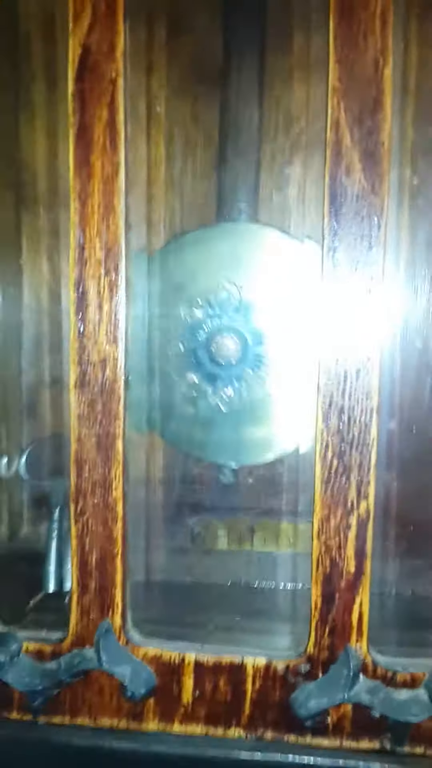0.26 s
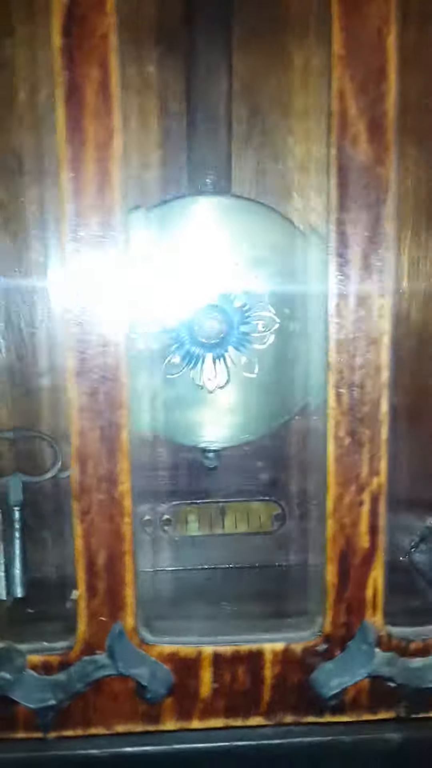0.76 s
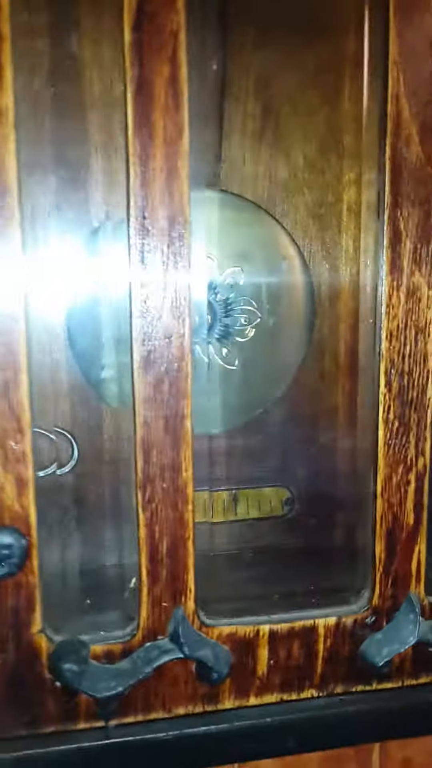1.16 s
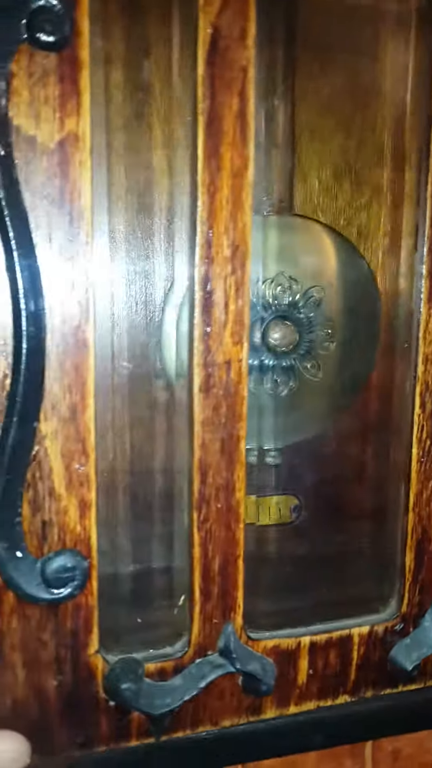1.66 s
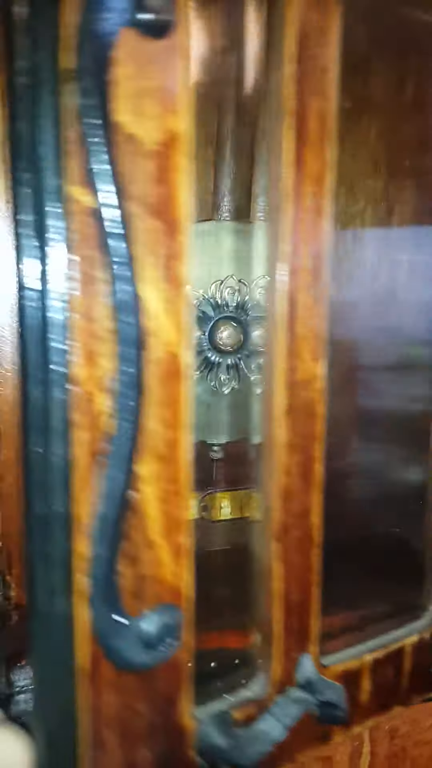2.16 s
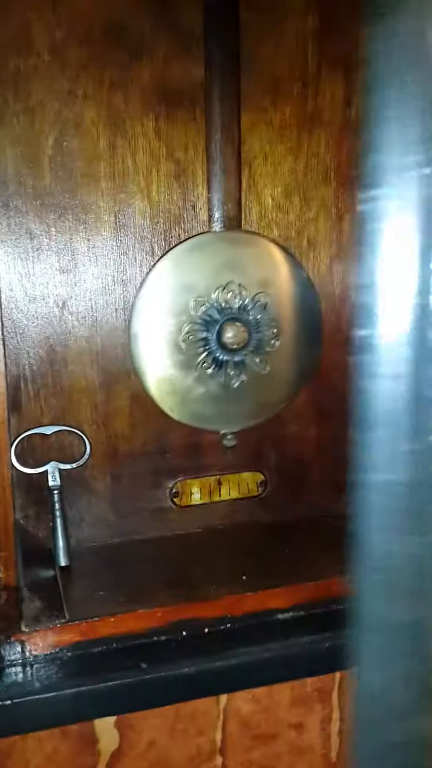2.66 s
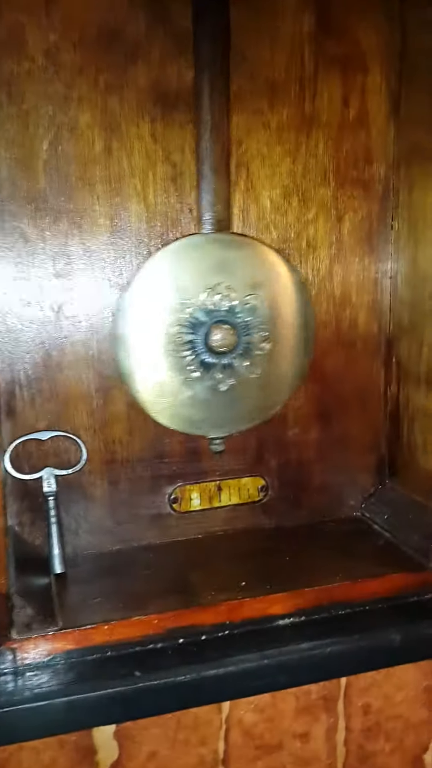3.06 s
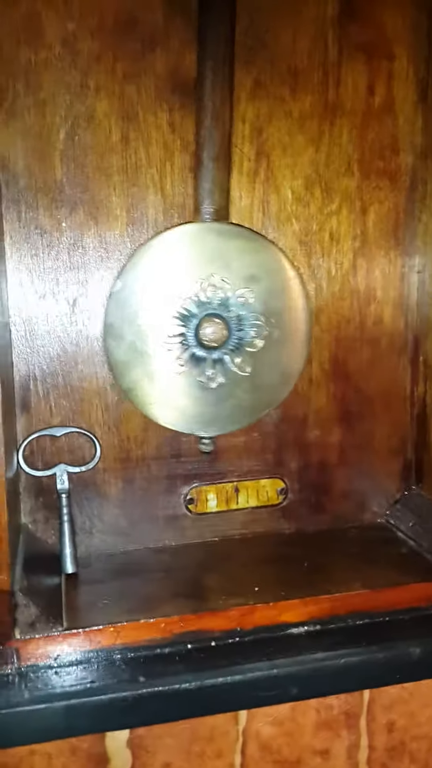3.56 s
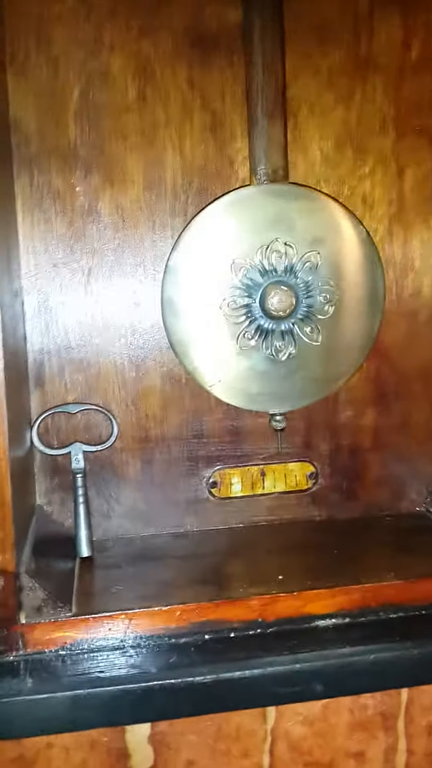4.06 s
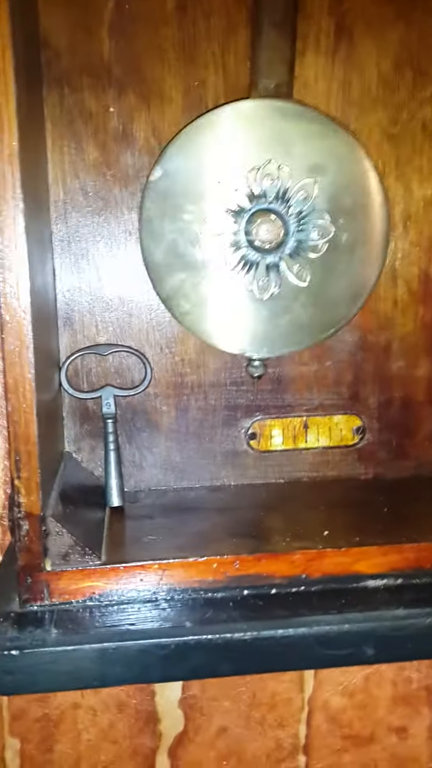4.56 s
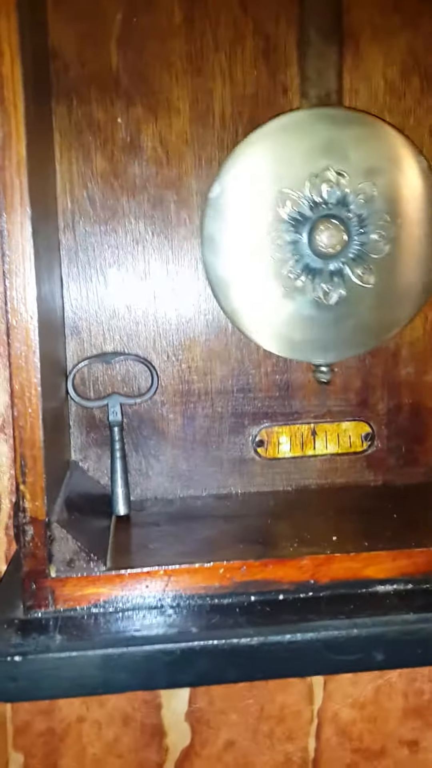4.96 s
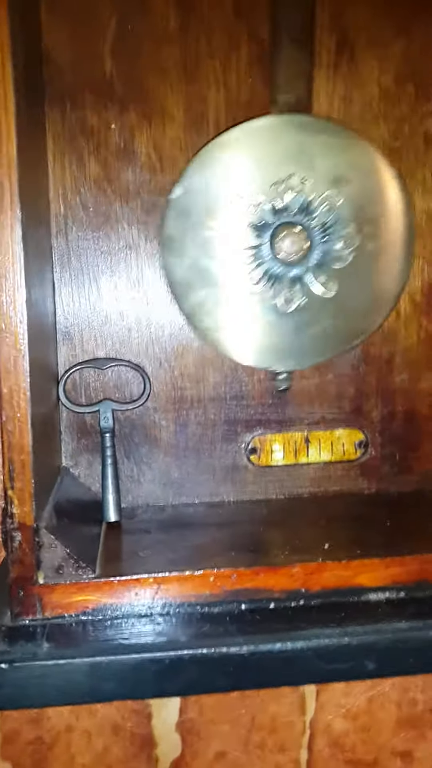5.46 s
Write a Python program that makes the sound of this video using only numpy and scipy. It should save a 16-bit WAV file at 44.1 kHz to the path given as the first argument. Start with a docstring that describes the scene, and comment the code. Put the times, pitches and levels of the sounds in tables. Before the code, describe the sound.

Metallic snaps and a wooden knock free a glazed clock door, then clear, slightly off-beat ticking continues over faint hum.

```python
"""First a dying metallic wash, then two sharp snaps of a door catch, over still air and a low motor hum; then
a wall clock ticks, slightly out of beat. A hand works the catch, and the glazed door comes free with a wooden
knock and swings open, so the ticking sounds brighter. Each tick is noise plus fading tones of wheel, plates and
case; the catch is shaped noise, the knocks are wood tones and noise. Beats and knocks keep the coiled gong
ringing faintly."""
import sys
import numpy as np
from scipy import signal
from scipy.fft import rfft, irfft, next_fast_len
from scipy.io import wavfile
from scipy.ndimage import uniform_filter1d, map_coordinates

SR = 44100
rng = np.random.default_rng(int(sys.argv[2]) if len(sys.argv) > 2 else 0)


def persist_wave(psi):
    """Save psi, clipped to +-1, as 16-bit WAV."""
    counts = np.round(np.clip(psi, -1, 1) * 32767).astype(np.int16)
    wavfile.write(sys.argv[1], SR, np.atleast_2d(counts).T)


N = 252468
NOW = np.arange(N) / SR  # time through the whole scene, s
T = np.arange(SR * 3 // 4) / SR  # time within one short sound, s

# All levels inside a colour or a set of tones are relative; each sound is scaled as a whole later.
# still air: pitch_hz, level_db_per_hz
AIR_COLOUR = [(20, -15), (35, -19), (60, -18.5), (110, -12.5), (200, -12.5), (280, -18.5), (545, -22),
              (1100, -26), (1650, -27.5), (2050, -23), (4250, -29), (5900, -23), (7500, -30.5),
              (16000, -32)]
# motors in the house: pitch_hz, level_db
MOTOR_HUM = [(48.6, -79), (52.6, -79), (97.6, -68.5), (129.5, -77.5), (147, -70.5), (245, -84.5),
             (342, -83)]
# left-right balance of the background: pitch_hz, left_minus_right_db
AIR_BALANCE = [(60, 4), (200, 1), (700, 1), (1290, -5.5), (2400, -1), (4400, -0.5), (8100, 1),
               (15000, -0.5)]
# left-right balance of the clock and its door: pitch_hz, left_minus_right_db
CLOCK_BALANCE = [(60, -29), (110, 4.5), (200, 1), (400, 2), (1300, -2), (2400, -1), (4400, -0.5),
                 (8100, 5.5), (15000, 5.5)]
# how alike left and right are: pitch_hz, likeness (1 is the same)
LIKENESS = [(60, 0.67), (150, 0.97), (300, 0.68), (640, 0.52), (1400, -0.23), (3100, 0.16), (7000, -0.065),
            (15000, 0.017)]
# how long the room rings, as time to fall 60 dB: pitch_hz, t60_s
ROOM_DECAY = [(150, 0.63), (600, 0.53), (2000, 0.4), (6000, 0.35), (14000, 0.13)]

# the hand slides on the case, the door rubs on its hinges: start_s, length_s, level_db
RUBS = [(0, .07, -61), (0.553, 0.16, -60), (0.834, .05, -64.5), (0.988, .28, -61), (1.29, 0.18, -52.5),
        (1.59, 1.2, -65), (1.9, 0.076, -61.5)]
# sound of the rubbing: pitch_hz, level_db_per_hz
RUB_COLOUR = [(100, 4), (250, 10), (600, 2), (1200, 0), (2200, 0.5), (3500, -3), (6000, 3), (9000, -7.5),
              (16000, -12)]
RUB_ATTACK_S, RUB_RELEASE_S = 0.01, 0.077

# how freely the clock's sound comes out: time_s, clearness (0 to 1)
CLEARNESS = [(0, 0.52), (1.32, 0.43), (1.6, 0.65), (2.2, 0.7), (2.7, 1)]
# what is let through at clearness 0: pitch_hz, level_db
MUFFLING = [(600, 3.5), (2000, 0.5), (3200, -16), (6400, -3.5), (11000, -36)]
# the door bumps in its frame: start_s, level_db, pitch_hz, contact (hard or soft)
KNOCKS = [(0.147, -56, 300, "hard"), (1.052, -50, 573, "soft"), (1.3176, -29, 234, "hard"),
          (1.356, -36.5, 330, "hard"), (1.425, -40, 170, "soft"), (1.597, -53, 215, "soft"),
          (1.992, -48, 504, "soft"), (2.101, -59.5, 202, "soft"), (2.485, -48.5, 260, "soft"),
          (2.509, -45.5, 267, "soft")]
# tones of the wooden case and door: pitch_hz, level_db, t60_s
WOOD_TONES = [(92, -15, .2), (128, -11, .2), (146, -1, .26), (174, 0, .24), (203, 2, .38), (276, -9, .22),
              (322, -1, .28), (383, -8, .34), (415, -14, .25), (440, -14, .25), (472, -12, .28),
              (499, -10, .33), (534, -11, .3), (570, -13, .22), (600, -9, .24), (648, -11, .22),
              (727, -15, .25), (827, -10, .25), (862, -13, .22)]
# wood tones too crowded to tell apart: pitch_hz, level_db_per_hz
THUD_COLOUR = [(50, -37), (110, 12), (200, -10.5), (270, 10), (600, -8), (1000, -6.5), (2500, -4),
               (8000, -41)]
# how far a blow reaches to each side of its pitch, and its rise time
HARD_REACH_OCTAVES, HARD_BLOW_RISE_S = 1.7, 0.0013
SOFT_REACH_OCTAVES, SOFT_BLOW_RISE_S = 0.37, 0.0011

# catch and hinges snap and scrape: start_s, level_db, hardness (0 to 1), t60_s, brightness_db_per_octave
SNAPS = [(0.0, -45, 0.65, 0.32, -2.5), (0.083, -34, 0.7, 0.36, 1), (0.138, -33, 0, 0.26, -1),
         (0.618, -42.5, 0.34, 0.23, -1.1), (0.671, -47.5, 0.2, 0.25, 1.3), (1.2746, -45, 0.54, .6, -1.5),
         (1.3167, -43, 0.84, .45, 3), (1.355, -35.5, 0.44, 0.3, -3.5), (2.508, -54.5, 0.5, 0.28, -0.5),
         (2.665, -52.5, 0.05, 0.19, 0.5), (4.167, -57.5, 0.34, 0.088, -4)]
# metal of the catch: pitch_hz, level_db_per_hz
METAL_COLOUR = [(180, -13), (300, -28), (405, -11), (624, -12.5), (1150, -13.5), (1780, -2.5), (2520, -3.5),
                (6850, 4.5), (8220, -7), (14000, -13), (15200, -23), (16000, -37)]
SOFT_RISE_S, HARD_RISE_S = .005, .0005
SOFT_CRACK_DB, HARD_CRACK_DB, CRACK_T60_S = -6, 14, .0035

# a faint tone at 1179 Hz, then the high overtones of the coiled gong: pitch_hz, level_db
RINGING_TONES = [(1179, -87), (2745, -88), (3090, -89.5), (5394, -94), (5690, -99), (5739, -83.5),
                 (5787, -80.5), (6132, -87.5), (6180, -103)]
GONG_DECAY_S, GONG_WAVER_DB = 0.99, 2.5  # time for the shaking to fall to about a third; random waver
JOLT_DB = 35  # a knock's shake over its level
# a low note, and how its level changes at clearness 0
NOTE_HZ, NOTE_DB, NOTE_MUFFLED_DB, NOTE_SWELL_DB = 193.7, -71, -9, 3

# a tooth lands on a pallet, tick and tock in turn: start_s, level_db, plates_db
BEATS = [(0.498, -45, 0.5), (1.094, -45.5, -5), (1.654, -42, -7), (2.242, -44, -2), (2.798, -39.5, -5),
         (3.389, -43.5, -1), (3.943, -41.5, 1), (4.537, -41.5, 0), (5.090, -41.5, 1.5), (5.687, -41, -4)]
# case under the movement: pitch_hz, tick_db, tock_db, t60_s
BOARD_TONES = [(311, -18.5, -15.5, 0.43), (538.6, -4, -8.5, 0.31), (594, -8, -8, 0.32),
               (622, -30, -12, 0.29), (757, -34, -9.5, 0.14), (812, -16, -8, 0.13), (940, -7.5, -9, 0.083),
               (983, -1, -12, 0.12), (1064, -28, -43.5, 1), (1500, -20.5, -20, 0.54), (1756, -20.5, -30, 1)]
# brass plates and anchor: pitch_hz, tick_db, tock_db, t60_s
PLATE_TONES = [(1960, -12.5, -22, 0.16), (1985, -7, -4, 0.21), (2050, -6, -26, 0.23),
               (2150, -5.5, -8.5, 0.31), (2177, 2, -4, 0.096), (2340, -52, -13, .16), (2561, 5, -2, 0.1),
               (2590, 5.5, 7, 0.06), (2820, -9, -59, 0.037), (2860, -20, -8, 0.2)]
# escape wheel: pitch_hz, tick_db, tock_db, t60_s
WHEEL_TONES = [(4920, -12, -13, .11), (5040, -12, -13, .1), (5330, -13, -10, .09), (5830, -18, -14, .13),
               (6115, -17, -11, .13), (6255, -16, -13, .13), (6390, -14, -13, .13), (6505, -10, -8, .14),
               (6590, -14, -10, .1), (7127, -15, -20, .12)]
# crowded short tones of the movement: pitch_hz, level_db_per_hz
CLACK_COLOUR = [(200, -13), (500, -4), (1250, -6.5), (2250, 1.5), (3500, -9), (5000, -2.5), (6500, 3.5),
                (8400, -21), (11000, -10), (13000, -14.5), (16000, -26)]
# first contact of steel on brass: pitch_hz, level_db_per_hz
SNAP_COLOUR = [(2000, -5), (6000, -1), (8400, -6), (11500, 2.5), (16000, -9.5)]
# tooth sliding on a pallet: pitch_hz, level_db_per_hz
SLIDE_COLOUR = [(120, -61), (300, -7), (550, -7.5), (1100, 2.5), (1750, 6), (2300, 3), (3600, -10),
                (5800, -3), (8500, -13.5), (16000, -18)]
# what each pallet shakes, over the level of the beat
TICK_CASE_DB, TICK_WHEEL_DB, TICK_RUB_DB = -4.5, 2.2, -13
TOCK_CASE_DB, TOCK_WHEEL_DB, TOCK_RUB_DB = -2.2, 5, -20

TOP_HZ = 15700  # nothing is heard above this


def amp(db):
    """Turn decibels into a plain multiplier."""
    return 10 ** (np.asarray(db) / 20)


def unit(x):
    """Scale to an rms (average strength) of 1."""
    return x / np.sqrt(np.mean(x ** 2) + 1e-20)


def along(points, hz):
    """Read a value between (pitch, value) points, on a log pitch axis."""
    f, v = np.transpose(points)
    return np.interp(np.log(hz + 1), np.log(f + 1), v)


def fade(t60, rise):
    """Loudness of a blow: a quick rise, then a steady dying away."""
    return np.exp(-np.log(1000) * T / t60) * (1 - np.exp(-T / rise))


def filtered(x, gain):
    """Multiply each pitch in x by its own gain."""
    n = x.shape[-1]
    m = next_fast_len(n + SR // 4)  # spare room, so the end does not wrap round to the start
    return irfft(rfft(x, m) * gain(np.fft.rfftfreq(m, 1 / SR)), m)[..., :n]


def spread(hz):
    """Angle between middle and side: bass is more alike at both ears than treble."""
    return np.arccos(np.clip(along(LIKENESS, hz), -1, 1)) / 2


def noise(colour, size=len(T)):
    """Stereo noise of rms 1 with the given balance of pitches."""
    def gain(hz):
        return amp(along(colour, hz)) * np.array([np.cos(spread(hz)), np.sin(spread(hz))])
    mid, side = filtered(rng.standard_normal((2, size)), gain)
    return unit(np.array([mid + side, mid - side]))


def uneven(depth_db, smooth_samples):
    """A random roughness of loudness, for gritty sounds."""
    return amp(depth_db * unit(uniform_filter1d(rng.standard_normal(len(T)), size=smooth_samples)))


def wobble(rate):
    """A smooth random curve through this many random points a second."""
    return map_coordinates(rng.standard_normal(256), [NOW * rate], mode="mirror")


def ring(tones, rise, blur_hz):
    """Struck tones die away, a little different each time; reflections blur each pitch."""
    out = np.zeros((2, len(T)))
    for k, (hz, db, t60) in enumerate(tones):
        lag = spread(hz) * rng.choice([-1, 1]) * np.array([[1], [-1]])
        drift = np.cumsum(rng.standard_normal(len(T))) * np.sqrt(2 * np.pi * blur_hz / SR)
        drift = uniform_filter1d(drift, size=160)
        tone = np.sin(2 * np.pi * hz * T + lag + drift)
        out += (-1) ** k * amp(db + rng.normal()) * fade(t60, rise) * tone
    return out


def add(track, s, sound):
    """Mix a sound into a track at time s."""
    start = max(round(s * SR), 0)
    part = track[:, start:start + sound.shape[1]]
    part += sound[:, :part.shape[1]]


def in_case(x, echo_db, count=6):
    """The near walls of the case return a few quick echoes, which strengthen some pitches and weaken others."""
    out = x.copy()
    for delay, sign in zip(rng.uniform(.001, .008, count), rng.choice([-1, 1], count)):
        add(out, delay, sign * amp(echo_db) * x)
    return out / np.sqrt(1 + count * amp(echo_db) ** 2)


def in_room(x, wet_db):
    """The room answers with a wash of echoes, whose pitches die away at their own speeds."""
    hz, t, bands = signal.stft(noise([(100, 0), (10000, 0)]), SR, nperseg=256)
    decay = np.exp(-np.log(1000) * t / along(ROOM_DECAY, hz)[:, None])
    tail = signal.istft(bands * decay, SR, nperseg=256)[1][:, :len(T)]
    tail = tail * (1 - np.exp(-T / 0.00074))
    tail = tail / np.linalg.norm(tail[0])
    # the left channel alone feeds both sides of the room
    return x + amp(wet_db) * signal.fftconvolve(x[:1], tail, axes=1)[:, :len(T)]


def clearness():
    """How freely the clock's sound comes out, from 0 to 1."""
    return np.clip(np.interp(NOW, *np.transpose(CLEARNESS)), 0, 1)


def panned(x, balance):
    """Each pitch is heard at unlike levels left and right."""
    return filtered(x, lambda hz: amp(along(balance, hz) * np.array([[.5], [-.5]])))


def background():
    """Still air is soft noise; the motor hum is low tones that waver in level and phase."""
    hum = 0
    for hz, db in MOTOR_HUM:
        hum = hum + amp(db + 2.2 * wobble(5)) * np.sin(2 * np.pi * hz * NOW + .7 * wobble(7))
    return hum + amp(-66.0) * noise(AIR_COLOUR, size=N)


def low_note():
    """A low 194 Hz note that swells unevenly, louder as the door opens."""
    level_db = NOTE_DB + NOTE_MUFFLED_DB * (1 - clearness()) + NOTE_SWELL_DB * wobble(8.9)
    return amp(level_db) * np.sin(2 * np.pi * NOTE_HZ * NOW + .8 * wobble(9))


def rubbing():
    """Sliding surfaces make noise: each rub sets in, holds and dies away, a little unevenly."""
    power = np.zeros(N)
    for s, length, db in RUBS:
        attack = np.clip((NOW - s) / RUB_ATTACK_S, 0, 1)
        release = np.exp(-np.maximum(NOW - s - length, 0) / RUB_RELEASE_S)
        power += (amp(db) * attack * release) ** 2
    return np.sqrt(power) * amp(2.0 * wobble(34.88)) * noise(RUB_COLOUR, size=N)


def door():
    """Each bump excites the wood around its own pitch; a hard one reaches more widely."""
    out = np.zeros((2, N))
    for s, db, blow_hz, contact in KNOCKS:
        hard = contact == "hard"
        octaves = HARD_REACH_OCTAVES if hard else SOFT_REACH_OCTAVES
        rise = HARD_BLOW_RISE_S if hard else SOFT_BLOW_RISE_S

        def reach_db(hz):
            return -10 * np.log10(1 + (np.log2((hz + 1) / blow_hz) / octaves) ** 4)

        struck = [(hz, level + reach_db(hz), t60) for hz, level, t60 in WOOD_TONES]
        tones = ring(struck, rise=rise, blur_hz=1.0)
        thud = noise(THUD_COLOUR) * fade(t60=.22, rise=rise)
        thud = filtered(thud, lambda hz: amp(reach_db(hz)))
        add(out, s, amp(db - 1.0) * (tones + thud))
    return out


def catch():
    """A crack, then a gritty wash of metal and glass; harder contact starts faster and cracks more."""
    out = np.zeros((2, N))
    for s, db, hardness, t60, bright_db in SNAPS:
        rise = SOFT_RISE_S * (HARD_RISE_S / SOFT_RISE_S) ** hardness
        crack_db = SOFT_CRACK_DB + (HARD_CRACK_DB - SOFT_CRACK_DB) * hardness
        colour = [(hz, level + bright_db * np.log2(hz)) for hz, level in METAL_COLOUR]
        wash = uneven(0.52, smooth_samples=110) * fade(t60, rise)
        crack = amp(crack_db) * fade(CRACK_T60_S, rise=.0001)
        add(out, s, amp(db) * noise(colour) * (wash + crack))
    return out


def gong():
    """Beats and knocks keep the gong's high overtones ringing, with a faint tone at 1179 Hz."""
    def shake(s):
        return (NOW > s) * np.exp(-np.abs(NOW - s) / GONG_DECAY_S)

    from_beats = sum(shake(s) for s, *_ in BEATS)
    from_knocks = np.sqrt(sum((amp(db + JOLT_DB) * shake(s)) ** 2 for s, db, *_ in KNOCKS))
    tones = np.zeros((2, N))
    for hz, db in RINGING_TONES:
        lag = spread(hz) * np.array([[1], [-1]])
        tone = np.sin(2 * np.pi * hz * NOW + .6 * wobble(26) + lag)
        tones += amp(db + GONG_WAVER_DB * wobble(5.01)) * tone
    # overtones too crowded to tell apart: pitch_hz, level_db_per_hz
    crowded = [(4000, -24), (5300, -40), (5800, -32), (6400, 0), (7600, -10), (10000, -65)]
    shimmer = amp(-88.5) * noise(crowded, size=N)
    return (from_beats + from_knocks) * (tones + shimmer)


def slide(peak_s, width_s):
    """A tooth rubs grittily along the pallet face, swelling and fading; the case colours the sound."""
    grit = unit(uneven(2.5, smooth_samples=180))
    swell = 1 / np.cosh((T - peak_s) / width_s) ** 2
    return in_case(noise(SLIDE_COLOUR) * grit, echo_db=-4.5) * swell


def escapement():
    """Each tooth drops on a pallet and rings wheel, plates and case; low clearness muffles the treble."""
    out = np.zeros((2, N))
    for k, (s, db, plates_db) in enumerate(BEATS):
        tock = k % 2 == 1
        case_db = TOCK_CASE_DB if tock else TICK_CASE_DB
        wheel_db = TOCK_WHEEL_DB if tock else TICK_WHEEL_DB

        def struck(table):
            return [(hz, tock_db if tock else tick_db, t60) for hz, tick_db, tock_db, t60 in table]

        plates = amp(plates_db) * ring(struck(PLATE_TONES), rise=0.0042, blur_hz=13)
        wheel = amp(wheel_db) * ring(struck(WHEEL_TONES), rise=0.00064, blur_hz=23.3)
        board = amp(case_db) * ring(struck(BOARD_TONES), rise=0.0084, blur_hz=7.4)
        clack = amp(-2.9) * noise(CLACK_COLOUR) * fade(t60=0.14, rise=0.0015)
        snap = amp(0.5) * noise(SNAP_COLOUR) * fade(t60=0.021, rise=0.0012)
        # the snap arrives directly; the clack also comes by way of the case walls and the room
        clack = in_room(in_case(clack, echo_db=-12.0), wet_db=-3.5)
        add(out, s, amp(db) * (snap + plates + wheel + board + clack))
        # the pallet rubs just after the tick, and again on the way back before the tock
        if tock:
            add(out, s - .11, amp(db + TOCK_RUB_DB) * slide(peak_s=0.068, width_s=0.033))
        else:
            add(out, s, amp(db + TICK_RUB_DB) * slide(peak_s=0.078, width_s=0.044))
    muffled = filtered(out, lambda hz: amp(along(MUFFLING, hz)))
    return clearness() * out + (1 - clearness()) * muffled


def scene():
    """Mix the quiet room with the clock and its door."""
    clock = low_note() + rubbing() + door() + catch() + gong() + escapement()
    return panned(background(), AIR_BALANCE) + panned(clock, CLOCK_BALANCE)


def record(dry):
    """Weaken the deepest bass and cut everything from the top limit up."""
    bass_cut = [(25, -26), (36, -18), (47, -1.5)]  # pitch_hz, level_db
    return filtered(dry, lambda hz: amp(along(bass_cut, hz)) * (hz < TOP_HZ))


dry = scene()
out = record(dry)
persist_wave(out)
```